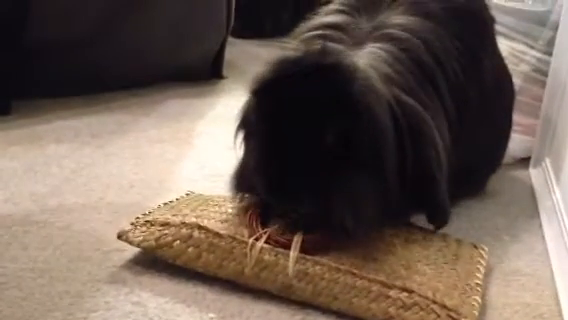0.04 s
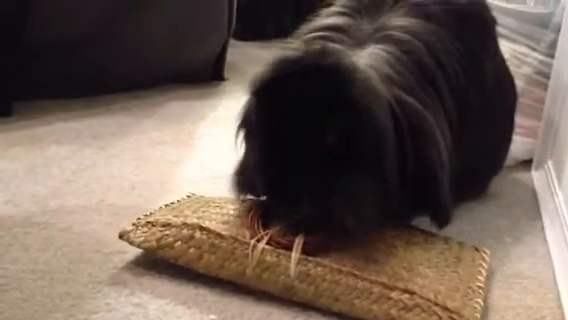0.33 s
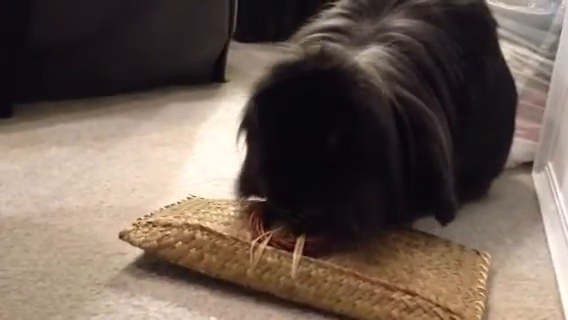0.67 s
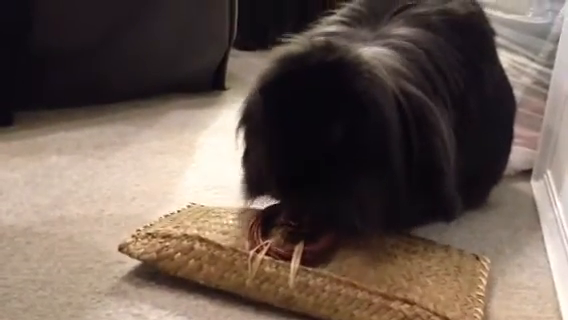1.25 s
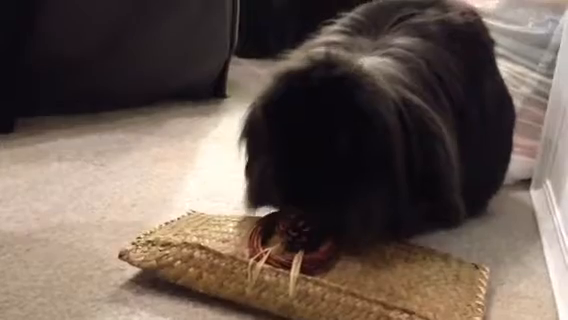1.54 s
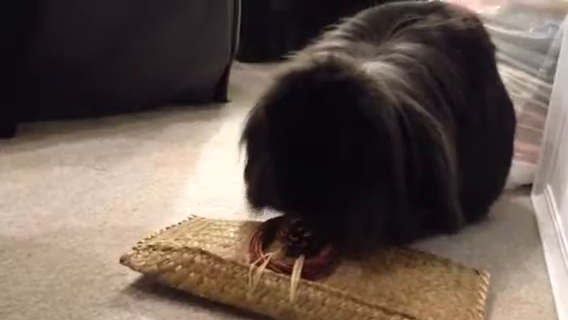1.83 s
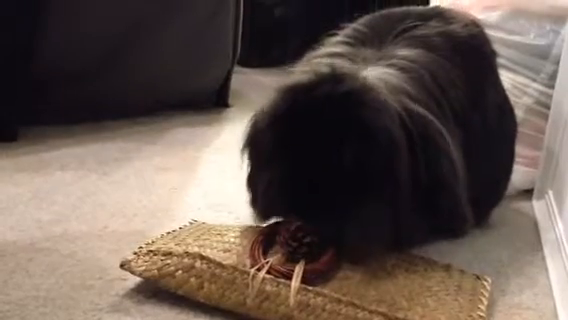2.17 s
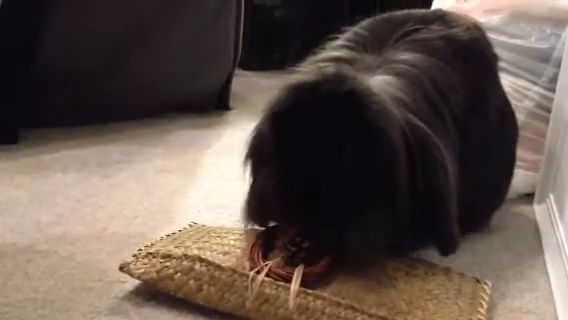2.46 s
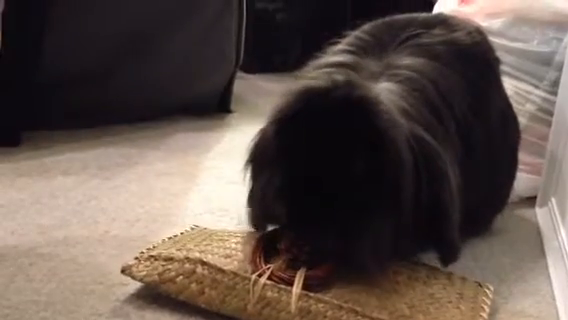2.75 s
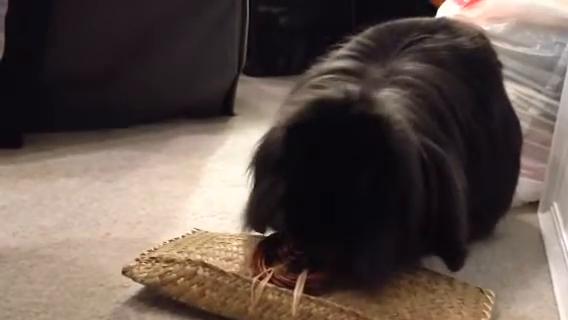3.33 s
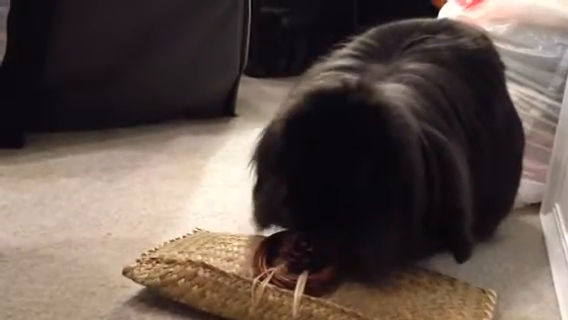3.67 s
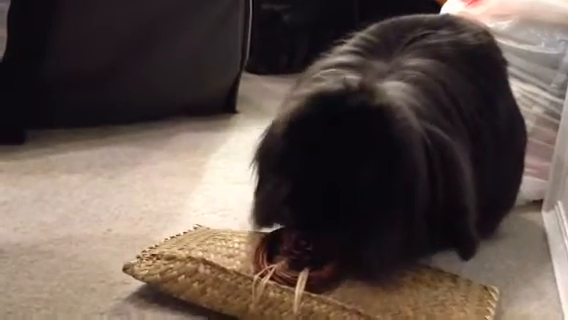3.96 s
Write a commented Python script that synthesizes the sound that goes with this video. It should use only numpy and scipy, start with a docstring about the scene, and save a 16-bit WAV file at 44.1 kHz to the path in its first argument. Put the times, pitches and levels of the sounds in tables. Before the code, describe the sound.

Close, dry clicks and small cracks come from a rabbit nibbling a pine cone on a woven mat. After about two seconds of only low room hum and faint hiss, a second, shorter cluster of bites follows.

```python
"""A rabbit gnaws a dry pine cone on a woven mat, close by in a carpeted room.
Each bite snaps woody fibres: a bright tick at the tooth, a crack of one of the cone's scales
and a dull knock of the whole cone. Fibres crackle as the teeth pull, and the cone rubs the mat.
The room echoes very briefly, over a low ventilation hum and a faint hiss."""
import sys
import numpy as np
from scipy import signal
from scipy.fft import rfft, irfft
from scipy.io import wavfile
from scipy.ndimage import uniform_filter1d

SR = 44100
rng = np.random.default_rng(int(sys.argv[2]) if len(sys.argv) > 2 else 0)


def log_audio(samples):
    """Write samples as a 16-bit WAV file to the path given in sys.argv[1]."""
    # one column per channel
    frames = np.atleast_2d(samples).T
    # limit to full scale, then quantise
    limited = np.clip(frames, -1, 1)
    pcm = np.round(limited * 32767).astype(np.int16)
    wavfile.write(sys.argv[1], SR, pcm)


N = 176400

# tone of the ventilation rumble (frequency [Hz], relative level [dB])
RUMBLE_TONE = [(20, -39), (35, -19), (50, -12), (68, -6), (105, -1), (170, -4), (235, -10.5), (285, -15),
               (420, -22), (600, -23.5), (790, -33.5), (1000, -32.5), (1450, -32), (2000, -37), (2900, -41),
               (8000, -79)]
# narrow bands of hum (pitch [Hz], width [Hz], level [dB])
HUM_BANDS = [(69.8, 5.9, -62.5), (100.2, 4.6, -63.5), (116, 10.3, -64), (168.5, 4.8, -59.5),
             (195.4, 8.4, -68.5), (254.6, 6.9, -61.5), (300.4, 4, -74), (393.8, 14.4, -74.5),
             (1525, 116, -81.5)]
# brief chance rises in the level of the low background noise (time [s], boost [dB])
LOW_NOISE_RISES = [(0.45, 2.5), (1.08, 3.5), (1.31, 5.5), (1.6, 4.5), (2.15, 2), (3.78, 0)]
# tone of the microphone hiss (frequency [Hz], relative level [dB])
HISS_TONE = [(300, 6), (2800, -4.5), (3600, 0.5), (6500, -1.5), (10000, -2), (15000, -3)]
# how the path from mouth to microphone changes the tone (frequency [Hz], gain [dB])
PATH_TONE = [(250, 2), (450, 1.5), (2150, 0.1), (2600, -5.5), (3200, -0.5), (5200, 0), (6100, 0.5),
             (6900, -2.5), (7800, -0.5), (10000, -2), (15000, 1)]
# one drag over the mat (start [s], end [s], pitch [Hz], width [Hz], level [dB])
MAT_DRAG = (0.1, 0.9, 4000, 1200, -76.5)
# spells of tugging at the fibres (start [s], end [s], tick rate [1/s], level [dB])
TUGS = [(0.016, 0.33, 45, -66.5), (0.447, 0.502, 80, -62), (0.552, 0.562, 360, -59),
        (0.618, 1.143, 18, -66), (3.168, 3.461, 25, -67)]
# how a snapping fibre rings (pitch [times the tick's pitch], relative level [dB], width [Hz])
FIBRE_RINGS = [(.82, -2.5, 1900), (1.0, 8.5, 1740), (1.2, 1, 2660)]
# how the whole cone rings (pitch [Hz], relative level [dB], width [Hz])
CONE_RINGS = [(574, 0, 204), (1027, -2.5, 214), (1500, -5, 390), (2010, 1.5, 315)]
# snaps of the wood (time [s], knock level [dB], knock pitch [Hz], crack level [dB],
# low crack pitch [Hz], high crack pitch [Hz], tick level [dB], tick pitch [Hz],
# splinter level against the main break [dB])
BITE_SNAPS = [(0.035, -63, 1150, -53, 3990, 4970, -53, 8420, 6),
              (0.0466, -46, 1510, -40.5, 3900, 5300, -36.5, 8940, -1),
              (0.0613, -74, 1350, -73, 3300, 4660, -56, 9060, 1),
              (0.1079, -56.5, 1270, -51.5, 3470, 4370, -42.5, 10240, -2),
              (0.1334, -60, 1290, -51.5, 3780, 4300, -38.5, 12300, -4),
              (0.1736, -62.5, 700, -59.5, 3700, 4390, -41, 10150, -6),
              (0.234, -68, 1000, -68, 3700, 4950, -62, 10500, -6),
              (0.4586, -69, 1190, -53, 4120, 5580, -47.5, 10610, -2),
              (0.4619, -46, 1500, -42.5, 4140, 4560, -27.5, 10300, -10),
              (0.4862, -64, 700, -71, 3470, 4700, -53, 12500, -3),
              (0.5011, -64, 870, -73, 3790, 4850, -47, 10100, -11),
              (0.5623, -37.5, 1080, -40, 3640, 4730, -25, 10500, -6),
              (0.5657, -46, 915, -47.5, 3600, 4960, -38.5, 10480, 0),
              (0.6347, -74, 990, -74, 3700, 5170, -59.5, 9300, -4),
              (0.7541, -48.5, 590, -42.5, 3600, 4370, -51.5, 12340, 1),
              (0.7633, -56, 940, -52, 3250, 4600, -53, 9410, -1),
              (0.77, -52, 1090, -53, 3280, 4280, -54, 10070, 4),
              (0.7879, -56.5, 1260, -54, 3080, 4330, -48, 9800, -6),
              (0.9812, -50, 540, -46, 3220, 4230, -44, 11600, 2),
              (0.9883, -51, 650, -46.5, 3340, 4330, -40, 10000, -7),
              (3.1989, -63, 600, -45.5, 3760, 4350, -49.5, 7300, -5),
              (3.206, -66, 910, -61, 3830, 5160, -55, 9700, 4),
              (3.2475, -49, 400, -36.5, 3840, 5400, -39, 7200, -4),
              (3.3162, -78, 1050, -63, 3590, 4480, -57, 7840, -8),
              (3.3649, -45, 1000, -43.5, 3080, 4540, -37, 8350, 4),
              (3.3654, -47.5, 1140, -45, 3080, 4770, -36, 10900, 2),
              (3.3737, -57, 990, -50.5, 3110, 5500, -42, 9000, 4)]

RUMBLE_DB, HISS_DB, RISE_S = -52, -67, 0.03
ECHO_S, ECHO_DB = 0.005, -13.5
SCATTER_DB, SCATTER_FADE_S = -15.5, 0.033  # a fade is the time to fall by 60 dB
TAIL_DB, TAIL_FADE_S = -14, 0.12
TAIL_CUTOFF_HZ = 5500  # carpet and fur soak up the treble
TUG_PITCH_HZ, TUG_SPREAD_DB = 9900, 4
LEAD_S, SPLINTER_S = 0.002, 0.0008  # gap before a break; how fast its splinters die
GRIP_WIDTH_HZ = 1170  # width of the part of the knock that a bite favours
SCALE_LOW_WIDTH_HZ, SCALE_HIGH_WIDTH_HZ = 830, 1130  # a wider ring dies sooner
BODY_LAG_S = 0.0003  # the scale and the cone answer just after the fibre snaps


def undb(db):
    """Turn decibels into a gain."""
    return 10 ** (np.asarray(db) / 20)


def unit(x):
    """Scale a sound so that its energy is 1."""
    return x / np.sqrt(np.sum(x ** 2) + 1e-18)


def at_level(click, db, span_s=0.003):
    """Give a click the energy of a steady sound of level db lasting span_s."""
    return unit(click) * np.sqrt(span_s * SR) * undb(db)


def add(out, start, x):
    """Mix a sound in at a time in seconds."""
    i = max(int(start * SR), 0)
    out[i:i + len(x)] += x[:max(N - i, 0)]


def noise(gain, db):
    """Steady noise with a gain for each frequency and an overall level."""
    return unit(irfft(rfft(rng.standard_normal(N)) * gain, N)) * np.sqrt(N) * undb(db)


def noise_band(hz, width, db):
    """Steady noise gathered around one pitch."""
    f = np.fft.rfftfreq(N, 1 / SR)
    return noise(1 / (1 + (2 * (f - hz) / width) ** 2), db)


def tone_curve(points):
    """Join (Hz, dB) points into a gain for each frequency."""
    hz, db = np.array(points).T
    return undb(np.interp(np.log(np.fft.rfftfreq(N, 1 / SR) + 1), np.log(hz), db))


def shape(x, gain):
    """Filter with a gain for each frequency, keeping sudden starts sharp (minimum phase)."""
    cepstrum = irfft(np.log(gain + 1e-9))
    half = len(cepstrum) // 2
    cepstrum[1:half] *= 2
    cepstrum[half + 1:] = 0
    return irfft(rfft(x) * np.exp(rfft(cepstrum)))


def outline(x, smooth_hz=260):
    """Broad outline of a sound's spectrum; dividing by it evens out the tone."""
    return np.sqrt(uniform_filter1d(np.abs(rfft(x)) ** 2, int(smooth_hz * len(x) / SR)) + 1e-12)


def ventilation():
    """The ventilation makes a steady rumble with narrow bands of hum."""
    rumble = noise(tone_curve(RUMBLE_TONE), RUMBLE_DB)
    return rumble + sum(noise_band(hz, width, db) for hz, width, db in HUM_BANDS)


def low_noise_rises(x):
    """The low background noise gets briefly louder at the listed times."""
    f, t = np.fft.rfftfreq(N, 1 / SR), np.arange(N) / SR
    bass = irfft(rfft(x) / (1 + (f / 220) ** 8), N)
    rise_db = sum(db * np.exp(-((t - when) / RISE_S) ** 2) for when, db in LOW_NOISE_RISES)
    return x + bass * (undb(rise_db) - 1)


def hiss():
    """The microphone adds a faint, even hiss."""
    return noise(tone_curve(HISS_TONE), HISS_DB)


def room(x, size=8192):
    """Sound bounces off a wall, scatters off nearby things and leaves a short, dull tail."""
    t = np.arange(size) / SR

    def reflections(fade_s):
        return unit(rng.standard_normal(size) * np.exp(-np.log(1000) * t / fade_s) * (t > .0006))

    dulling = signal.butter(1, TAIL_CUTOFF_HZ, fs=SR, output="sos")
    tail = undb(TAIL_DB) * signal.sosfilt(dulling, reflections(TAIL_FADE_S))
    scatter = undb(SCATTER_DB) * reflections(SCATTER_FADE_S)
    wall_echo = undb(ECHO_DB) * np.sinc((t - ECHO_S) * SR)
    response = (t == 0) + scatter + tail + wall_echo
    return signal.fftconvolve(x, shape(response, 1 / outline(response)))[:N]


def mat_rub():
    """The cone drags softly over the weave of the mat."""
    start, end, hz, width, db = MAT_DRAG
    t = np.arange(N) / SR
    swell = np.sin(np.pi * np.clip((t - start) / (end - start), 0, 1))
    return swell * noise_band(hz, width, db)


def wood_break(splinter_db, size=2048):
    """The push of one sharp break and its quick spray of splinters, with an even tone."""
    t = (np.arange(size) - int(LEAD_S * SR)) / SR
    spray = rng.standard_normal(size) * rng.exponential(1, size) * np.exp(-np.abs(t) / SPLINTER_S)
    force = (t == 0) + undb(splinter_db) * unit(spray * (t > .0002))
    return irfft(rfft(force) / outline(force)) * (t < size / SR / 2)


def ring(force, rings, tuning=1):
    """Wood rings very briefly after a push; tuning multiplies its pitches."""
    f = np.fft.rfftfreq(len(force), 1 / SR)
    power = sum((undb(db) / (1 + 2 * ((f - tuning * pitch) / width) ** 2)) ** 2
                for pitch, db, width in rings)
    return shape(force, np.sqrt(power))


def fibre_crackle():
    """Single fibres give way at random while the rabbit tugs."""
    out = np.zeros(N)
    for start, end, rate, db in TUGS:
        count = int((end - start) * rate)
        for when, pitch, strength in rng.random((count, 3)):
            tick = ring(wood_break(splinter_db=-2), FIBRE_RINGS, TUG_PITCH_HZ * (.85 + .3 * pitch))
            tick_db = db + TUG_SPREAD_DB * (2 * strength - 1)
            add(out, start + when * (end - start), at_level(tick, tick_db))
    return out


def bites():
    """Each snap rings the fibre (tick), one scale (crack) and the whole cone (knock)."""
    out = np.zeros(N)
    for (start, knock_db, knock_hz, crack_db, low_hz, high_hz,
         tick_db, tick_hz, splinter_db) in BITE_SNAPS:
        force = wood_break(splinter_db)
        cone = ring(force, CONE_RINGS)
        # where the tooth presses decides which part of the knock stands out
        knock = ring(cone, [(knock_hz, 0, GRIP_WIDTH_HZ)])
        crack = ring(force, [(low_hz, 0, SCALE_LOW_WIDTH_HZ), (high_hz, 0, SCALE_HIGH_WIDTH_HZ)])
        tick = ring(force, FIBRE_RINGS, tick_hz)
        add(out, start - LEAD_S, at_level(tick, tick_db))
        add(out, start - LEAD_S + BODY_LAG_S, at_level(knock, knock_db) + at_level(crack, crack_db))
    return out


def scene():
    """The gnawing rabbit in the quiet room, in one channel."""
    background = low_noise_rises(ventilation()) + hiss()
    gnawing = room(bites() + fibre_crackle() + mat_rub())
    return (background + shape(gnawing, tone_curve(PATH_TONE)))[None]


def record(dry):
    """Cut off the highest treble steeply."""
    f = np.fft.rfftfreq(N, 1 / SR)
    top_hz = 15200
    return irfft(rfft(dry) / np.sqrt(1 + (f / top_hz) ** 200), N)


dry = scene()
out = record(dry)
log_audio(out)
```